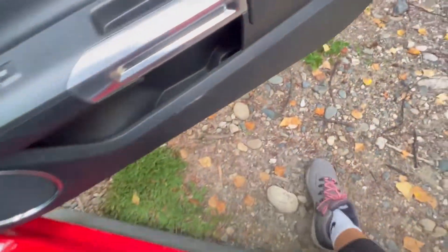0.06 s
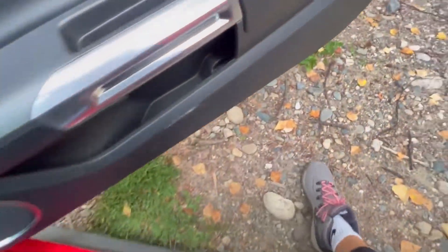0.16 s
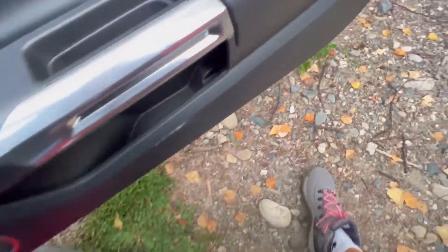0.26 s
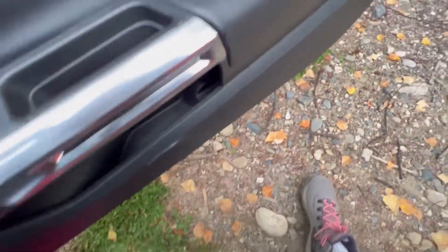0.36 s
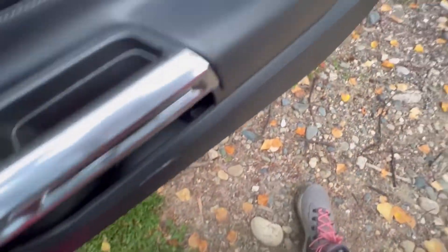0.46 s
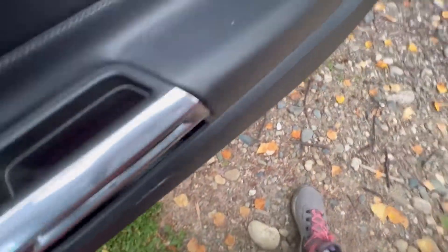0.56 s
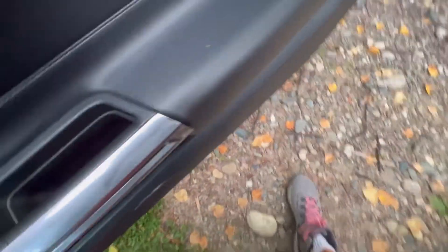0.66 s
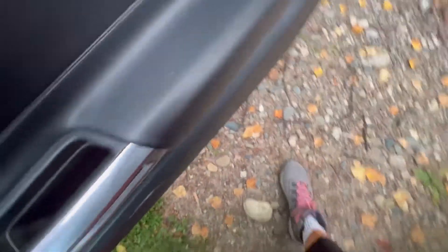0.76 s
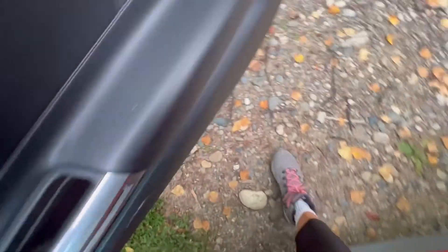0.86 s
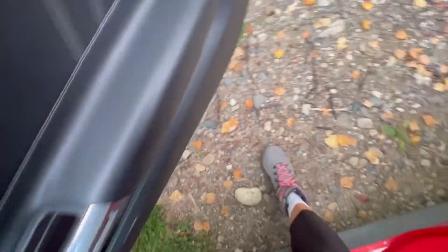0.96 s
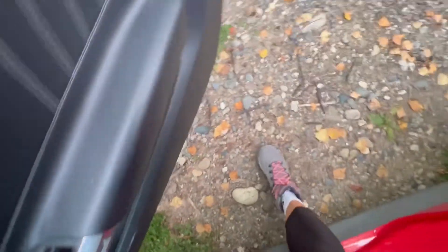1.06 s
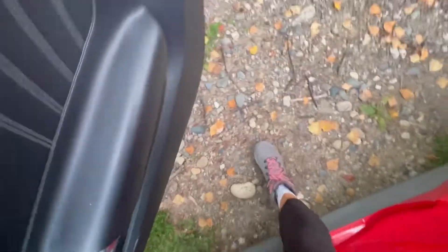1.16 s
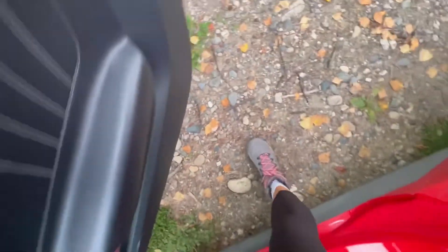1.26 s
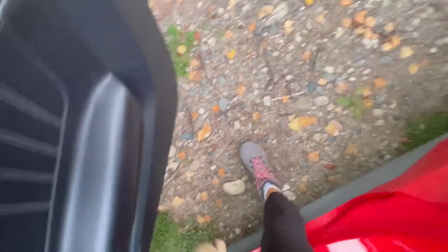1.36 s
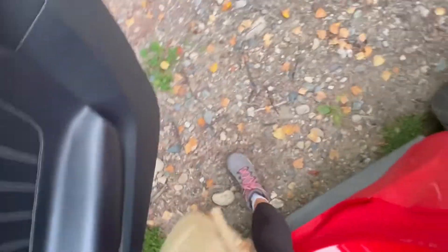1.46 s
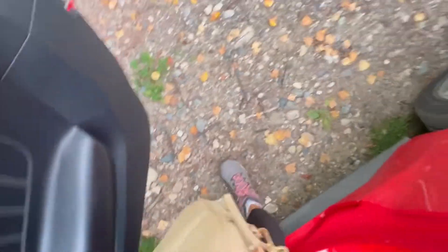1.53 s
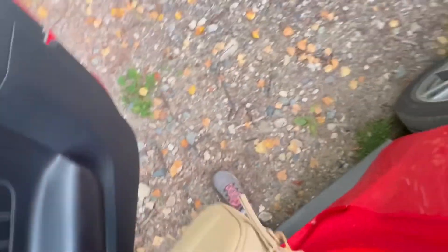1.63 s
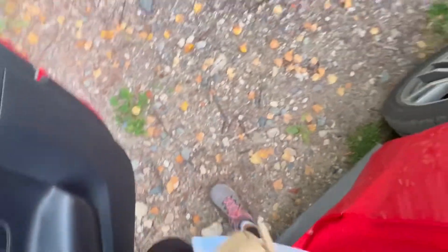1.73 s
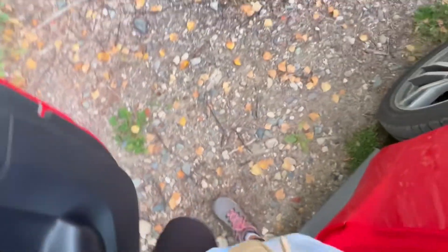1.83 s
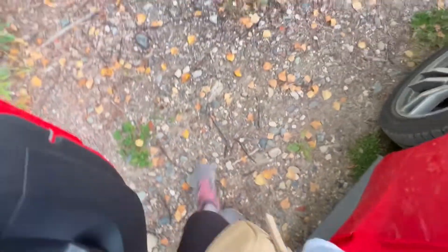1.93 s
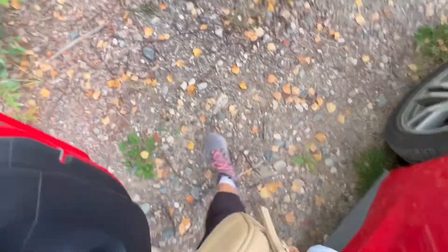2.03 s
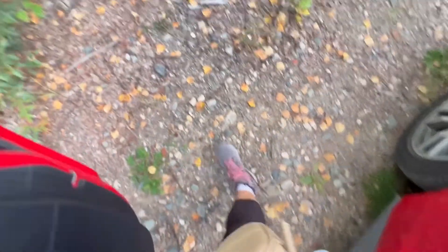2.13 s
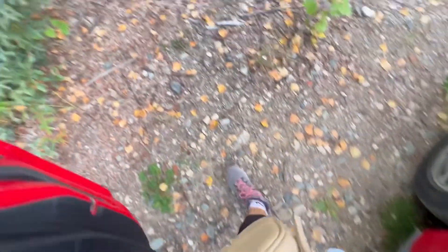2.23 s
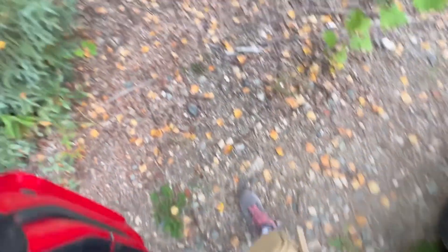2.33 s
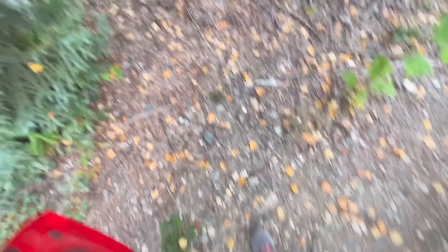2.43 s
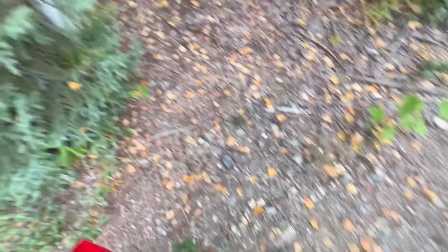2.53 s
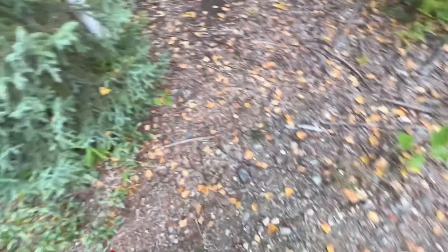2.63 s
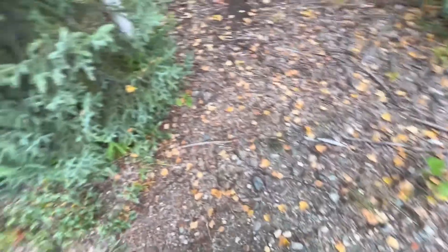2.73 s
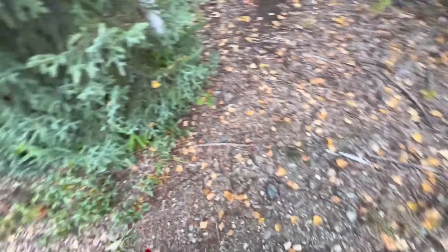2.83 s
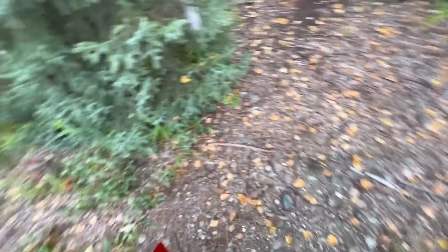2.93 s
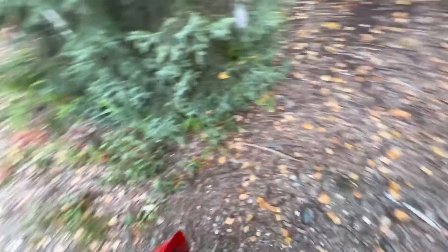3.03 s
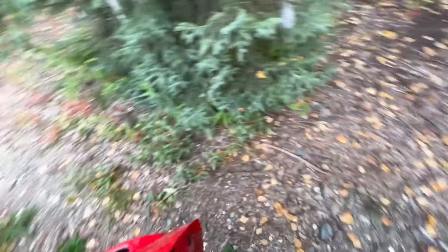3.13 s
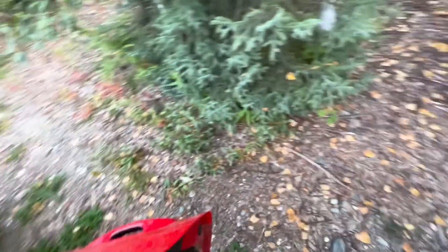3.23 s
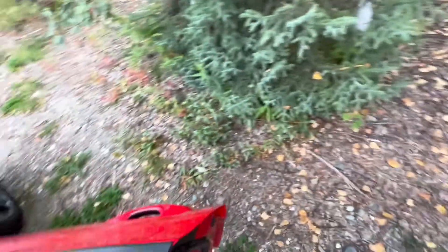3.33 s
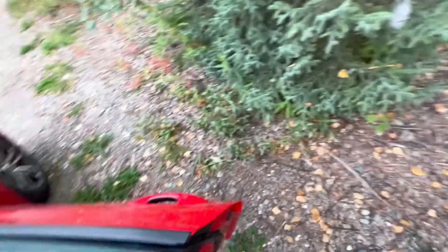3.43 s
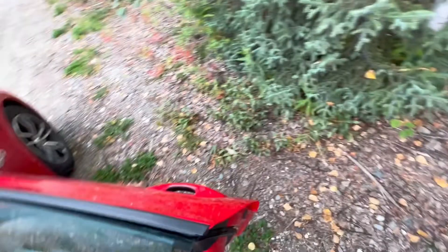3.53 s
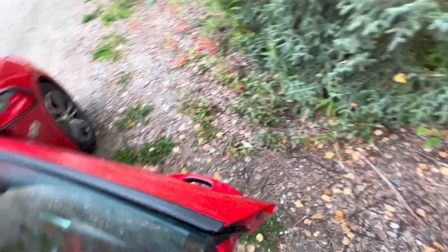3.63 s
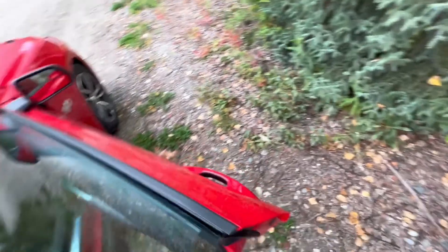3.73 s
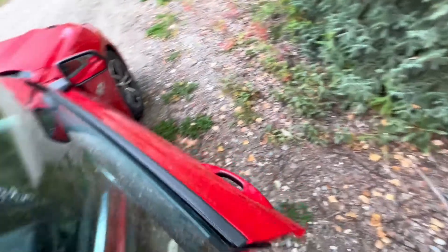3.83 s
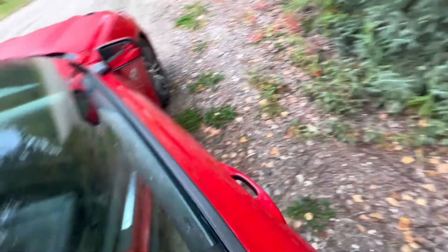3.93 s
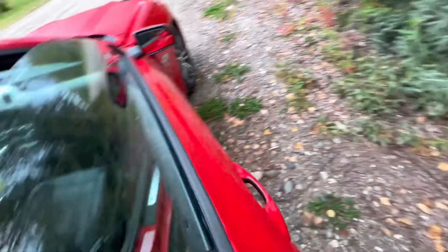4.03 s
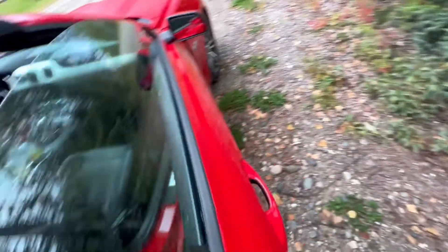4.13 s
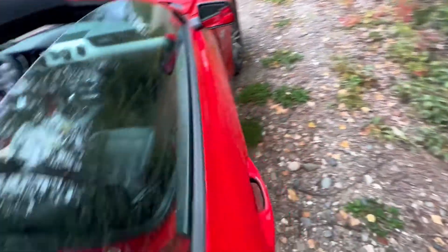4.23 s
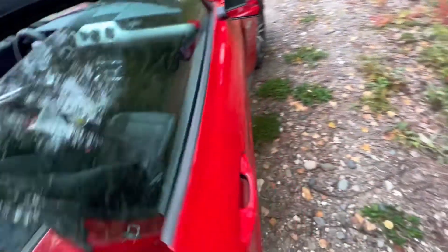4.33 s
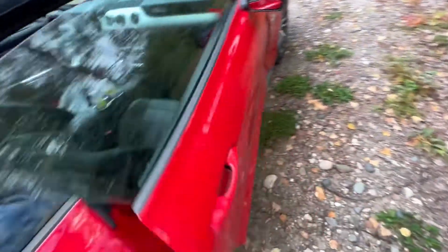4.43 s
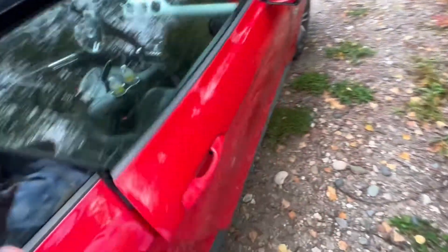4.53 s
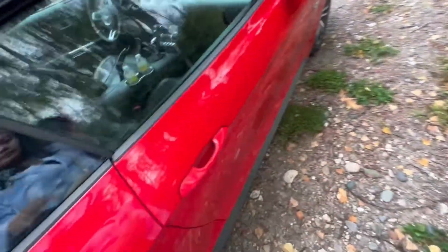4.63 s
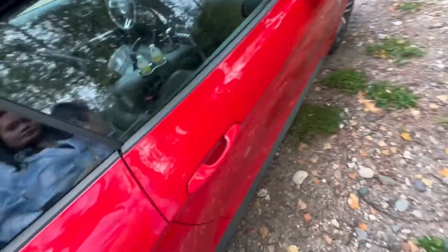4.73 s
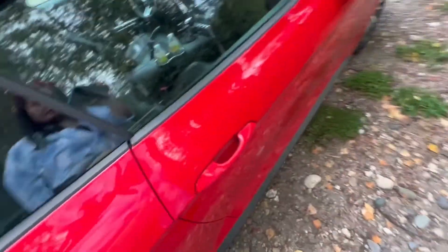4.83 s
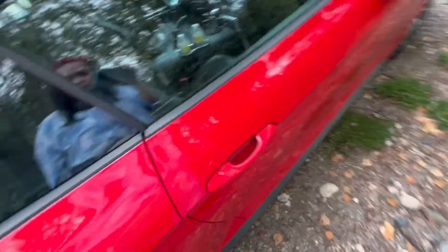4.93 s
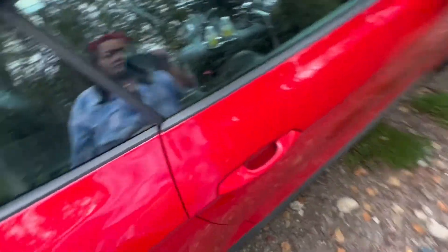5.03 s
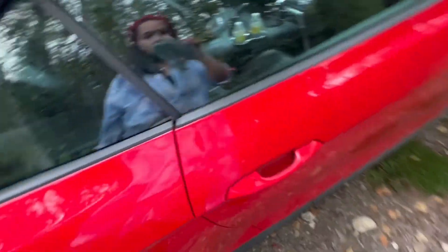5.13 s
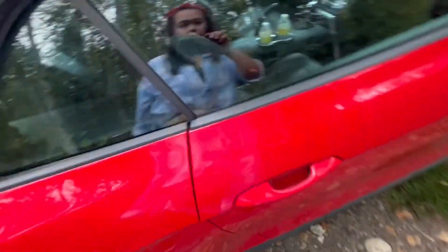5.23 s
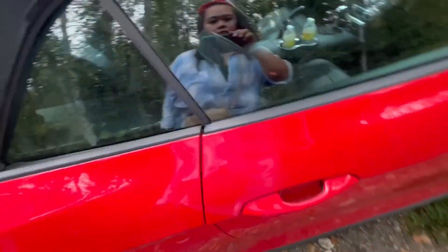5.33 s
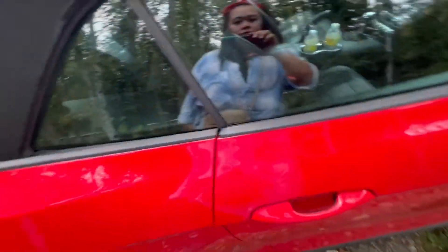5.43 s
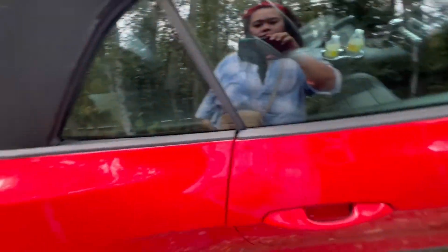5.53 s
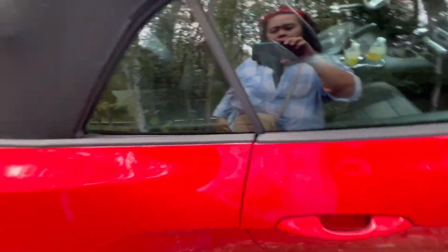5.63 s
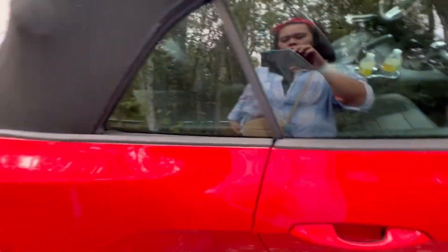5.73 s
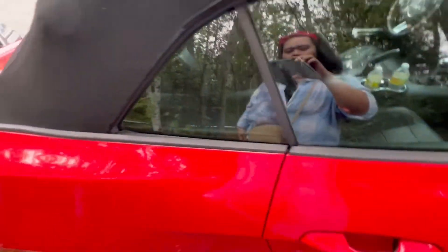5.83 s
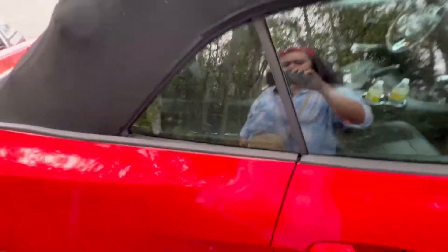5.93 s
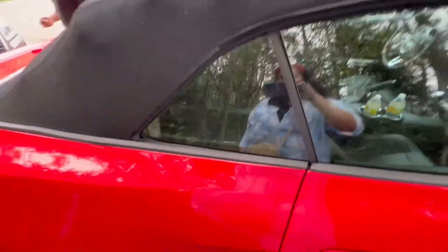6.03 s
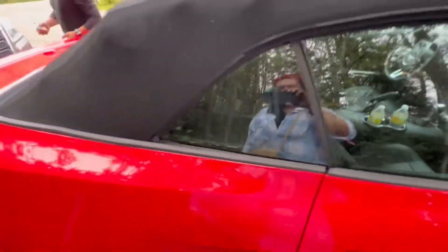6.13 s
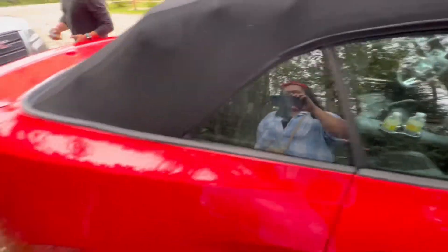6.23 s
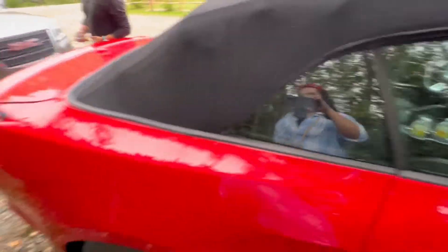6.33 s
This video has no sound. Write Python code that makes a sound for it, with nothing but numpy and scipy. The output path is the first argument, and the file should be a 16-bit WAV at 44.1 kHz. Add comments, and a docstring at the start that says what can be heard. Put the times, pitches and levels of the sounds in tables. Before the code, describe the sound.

A quiet outdoor gravel spot, heard close up on a handheld stereo microphone. From 0 to 0.6 s there are small knocks and clicks, gritty scuffs, hissing cloth and low handling rumble, with a soft low bump near 0.65 s. Faint steps and rustles continue around 1 and 1.7 s. Between 2.1 and 2.6 s, sharper dry knocks and a gravel crunch stand out. Around 2.9 to 3.3 s come gravel scuffs, fizzy fine rustling and a brief faint creak, then a near-quiet stretch. At 4.55 s a car door slams, by far the loudest event: a sharp metallic latch crack, rattling panels and a deep body boom. A duller, softer thud follows at 4.9 to 5.0 s. The resonance fades with faint echoes from ground and trees. Weak bumps come near 5.3 s, then light scuffs, rustles, clicks and handling rumble until about 6.4 s.

```python
"""Parking place on gravel, outdoors: a car door slams, with steps and rustling clothes around it.
Damped modes and soft pushes make the body boom; noise washes and modes the panels; short bursts the latch.
A second, duller door thud follows at once. Ground and trees return faint copies of the door sounds.
Clicks, knocks, scuffs and a creak are ringing ticks; grainy noise makes the gravel crunch and the cloth hiss.
A hand shifting on the camera rumbles over quiet outdoor air."""
import sys
import numpy as np
from scipy import signal
from scipy.fft import rfft, irfft, next_fast_len
from scipy.io import wavfile
from scipy.ndimage import uniform_filter1d, map_coordinates

SR = 44100
rng = np.random.default_rng(int(sys.argv[2]) if len(sys.argv) > 2 else 0)


def wav_record(signal):
    """Record a signal, one row per channel, as 16-bit PCM in the file named by sys.argv[1]."""
    frames = np.transpose(np.atleast_2d(signal))
    bounded = np.clip(frames, -1, 1)
    # unit amplitude maps onto the largest positive 16-bit level
    quanta = np.round(bounded * 32767).astype(np.int16)
    wavfile.write(sys.argv[1], SR, quanta)


N = 281799
TIME = np.arange(N) / SR  # s
FFT_SIZE = next_fast_len(N, True)
FREQ = np.fft.rfftfreq(FFT_SIZE, 1 / SR)  # Hz


def amp(db):
    """Decibels to gain."""
    return 10 ** (np.asarray(db) / 20)


def unit(x):
    """Scales to rms 1."""
    return x / np.sqrt(np.mean(x ** 2) + 1e-20)


def decay(t, t60_s):
    """Exponential decay, 60 dB down after t60_s."""
    return np.exp(-np.log(1000) * t / t60_s)


def read(points, hz):
    """Interpolates a spectrum table on a log-frequency axis."""
    f, value = np.transpose(points)
    return np.interp(np.log(hz + 1), np.log(f + 1), value)


def resonance(hz, centre_hz, sharpness):
    """Gain of a resonance, 1 at its centre."""
    return 1 / (1 + (sharpness * (hz / centre_hz - centre_hz / (hz + 1))) ** 2)


def panned(db):
    """Left and right gains of constant power for a left-right difference in dB."""
    half_db = np.atleast_1d(db) / 2
    gains = np.array([amp(half_db), amp(-half_db)])
    return gains / np.sqrt(np.mean(gains ** 2, 0))


def add(mix, s, sound):
    """Mixes a stereo sound in at time s."""
    part = mix[:, max(round(s * SR), 0):][:, :sound.shape[-1]]
    part += sound[..., :part.shape[1]]


def colour(x, gain):
    """Filters a whole track by a gain given on FREQ."""
    return irfft(rfft(x, FFT_SIZE) * gain, FFT_SIZE)[:, :N]


def paired(z, hz):
    """Two unrelated spectra become a microphone pair: alike in the bass, apart in the treble."""
    # left-right likeness: f/Hz, correlation
    likeness = [(60, 0.55), (150, 0.99), (300, 1), (600, 0.21), (1200, 0.084), (16000, 0.071)]
    same = np.clip(read(likeness, hz), -1, 1)
    return np.array([z[0], same * z[0] + np.sqrt(1 - same ** 2) * z[1]])


def random_phases(hz):
    """Two flat spectra of random phase."""
    return np.exp(2j * np.pi * rng.random((2, len(hz))))


def noise(spectrum, grain_db=0, grains_per_s=900, patch_db=0, patch_hz=260, patch_s=0.046):
    """Stereo noise of a given spectrum, in short grains of uneven size whose colour wanders in patches."""
    draws = np.minimum(rng.exponential(1, N), 4)
    sizes = amp(grain_db * draws[(TIME * grains_per_s).astype(int)])
    grains = rng.standard_normal((2, N)) * sizes / np.sqrt(uniform_filter1d(sizes ** 2, size=3000))
    hz, t, z = signal.stft(grains, SR, nperseg=512, noverlap=384)
    field = rng.standard_normal((512, 256))
    places = np.meshgrid(t / patch_s, hz / patch_hz, indexing="ij")
    patches = unit(map_coordinates(field, places, order=1, mode="wrap"))
    gain = amp(read(spectrum, hz) + patch_db * patches)
    gain /= np.linalg.norm(gain, axis=1, keepdims=True)  # patches move the colour and keep the power
    z = paired(z.transpose(0, 2, 1), hz) * gain
    return unit(signal.istft(z.transpose(0, 2, 1), SR, nperseg=512, noverlap=384)[1][:, :N])


def burst(gain_at, t60_s, size=8192):
    """A sharp dying burst with the spectrum gain_at(hz), scaled to the energy of its envelope."""
    hz, t = np.fft.rfftfreq(size, 1 / SR), np.arange(size) / SR
    z = paired(random_phases(hz), hz) * gain_at(hz)
    shape = amp(-60 * t / t60_s) * (1 - np.exp(-t * SR / 10))  # rises over 10 samples
    return unit(irfft(z) * shape) * np.sqrt(np.mean(shape ** 2))


def ring(modes, t, phases):
    """Sum of exponentially dying modes (f/Hz, level/dB, t60/s)."""
    return sum(amp(db) * decay(t, t60_s) * np.cos(2 * np.pi * hz * t + phase)
               for (hz, db, t60_s), phase in zip(modes, phases))


def strokes(rows, attack_s, release_s, dip_db=0, size=64):
    """Gain of rows (start/s, hold/s, level/dB): each swells, dips or peaks in mid hold, and dies away."""
    t = TIME[::size]
    start, hold, db = np.transpose(rows)[:, :, None]
    swell = .5 + .5 * np.tanh((t - start) / attack_s)
    progress = np.clip((t - start) / hold, 0, 1)
    held = amp(db + dip_db * (.5 - np.sin(np.pi * progress)))
    gain = swell * held * np.exp(-np.maximum(t - start - hold, 0) / release_s)
    return np.interp(TIME, t, np.linalg.norm(gain, axis=0))


def lurch(depth_db, per_s):
    """Random unevenness of a movement, as a gain of rms 1."""
    draws = np.clip(rng.standard_normal(2048), -1.7, 1.7)
    return unit(amp(depth_db * np.interp(TIME * per_s, np.arange(len(draws)), draws)))


def click(hz, t60_s, sharpness=2.0, ring_db=0, overtone=2.03, overtone_db=-14,
          soft_cycles=0.8, port_rad=0.31, size=4096):
    """A noise tick in a resonance and its overtone plus a ring at its pitch, with the energy of its decay."""
    t = np.arange(size) / SR

    def gain_at(f):
        return resonance(f, hz, sharpness) + amp(overtone_db) * resonance(f, overtone * hz, sharpness)

    tick = burst(gain_at, t60_s, size=size)
    phase = rng.uniform(0, 2 * np.pi) + port_rad * rng.uniform(-1, 1, (1, 2, 1))
    tone = ring([(hz, ring_db, t60_s)], t, phase)
    x = (tick + tone) * (1 - np.exp(-(hz * t / soft_cycles) ** 2))  # soft onset
    return x * np.linalg.norm(decay(t, t60_s)) / np.linalg.norm(x, axis=1, keepdims=True)


def slips(drive, spread_db, t60_s, centre_hz, pitch_range, tilt_db, count):
    """Tiny ticks at random moments and pitches, their level following the movement that drives them."""
    out = np.zeros((2, N))
    for when, pitch, size, side in rng.uniform(-1, 1, (count, 4)):
        at = int((when + 1) / 2 * (N - 1))
        gain = drive[..., at, None] * amp(spread_db * size + tilt_db * pitch)
        tick = click(centre_hz * pitch_range ** pitch, t60_s, size=2048)
        add(out, at / SR, gain * panned(4 * side) * tick)
    return out


def boom(ring_db=-1, push_cycles=0.53):
    """Each thump is a soft low push, and the car body rings on."""
    # low thumps and rocking swings of the car body: t/s, level/dB, push swing f/Hz, ring share (factor)
    thumps = [(0.646, -36, 108, 0.98), (0.713, -34, 55.6, 0.5), (0.746, -40, 70, 0.25),
              (1.406, -49, 86, 0.77), (4.564, -12, 153.7, 1.24), (4.581, -7, 60.6, 0.96),
              (4.604, -4.5, 86, 0.22), (4.677, -10.5, 56.6, 0.6), (4.802, -36, 75.6, 2.1),
              (4.925, -15.5, 87, 0.96), (4.943, -15, 63, 1.3), (4.999, -16, 51.3, 0.85),
              (5.015, -16, 56.3, 0.29), (5.066, -21, 85, 0.22), (5.111, -21.5, 49, 0.3),
              (5.277, -33, 93, 0.66), (5.356, -31.5, 115.6, 1.3), (5.396, -34, 80.2, 0.53),
              (6.298, -44, 65, 1.3)]
    # car body and cabin air modes: f/Hz, relative level/dB, t60/s
    body_modes = [(43.1, -19, .3), (56.3, -19.5, 0.84), (76.95, -9, 0.56), (92.3, -14, 0.26),
                  (110, -11, 0.34), (169.7, -11.5, 0.34), (183.7, -10.5, 0.39), (266, 1.5, 0.61),
                  (312, -10.5, .3)]
    out, t = np.zeros((2, N)), np.arange(SR) / SR
    body = ring(body_modes, t, np.zeros(len(body_modes)))
    u = t - .05  # push peaks at u = 0
    for s, db, hz, share in thumps:
        push = np.exp(-.5 * (u * hz / push_cycles) ** 2) * np.cos(2 * np.pi * hz * u)
        rung = signal.fftconvolve(push, body)[:SR] * 2 / abs(push).sum()
        add(out, s + u[0], amp(db) * (push + share * amp(ring_db) * rung))
    return out


def panels(skin_db=-11, rattle_db=1.5, count=7, size=24576):
    """Each shake excites skin and window modes and a rattling noise wash that decays band by band."""
    # door panel shakes: t/s, level/dB, dull above f/Hz, rise/s, decay length (factor), left-right/dB
    shakes = [(0.631, -28.5, 3000, 0.00051, 0.49, 4.5), (4.542, -16, 2630, 0.00047, 1.05, -4.5),
              (4.551, -21.5, 13960, 0.0067, 1.0, -3), (4.563, -17, 487, 0.015, 0.84, -2.5),
              (4.583, -15.5, 1940, 0.00068, 0.9, -1.5), (4.622, -32, 6960, 0.0012, 0.7, 2),
              (4.635, -21, 2440, 0.00061, 0.54, -3.5), (4.655, -22.5, 695, 0.0059, 0.58, -2.5),
              (4.677, -29, 2383, 0.0013, 0.34, -2.5), (4.874, -28.5, 398, 0.018, 1.0, -2),
              (4.901, -21, 421, 0.013, 1.0, -1.5), (4.940, -21, 830, 0.0063, .9, 0.5),
              (4.979, -39.5, 880, 0.0066, 1.4, -18), (5.327, -44, 338, 0.0033, .6, -2)]
    # panel wash spectrum: f/Hz, relative density/dB
    wash_spectrum = [(82, -36.5), (140, -7.5), (174, -10), (286, -13.5), (425, -15.5), (529, -14.5),
                     (851, -17.5), (921, -12), (1370, -12), (1700, -21), (2630, -22), (4590, -29),
                     (5940, -24.5), (16000, -61)]
    # panel wash decay before the length factor: f/Hz, t60/s
    wash_decay = [(150, 0.39), (500, 0.34), (1200, 0.078), (3000, 0.22), (8000, 0.3), (16000, 0.14)]
    # door skin and window modes: f/Hz, relative level/dB, t60/s before the length factor
    skin_modes = [(378.6, -11.5, 0.23), (435.4, -4, 0.25), (494, -15, .33), (677, -10, 0.15),
                  (770, -10.5, 0.17), (950, -3.5, 0.33), (1102, -5, 0.21), (1207, 0.5, 0.29),
                  (1190, 1, 0.2), (1450, -3.5, 0.19), (1418, -1.5, 0.37), (1630, -11.5, 0.44),
                  (1560, -2, .22), (1809, -8, 0.18), (2270, -10.5, 0.1), (2640, -13, .14),
                  (2995, -4.5, 0.12), (3330, -12, .13), (3176, -16.5, .17), (4100, -7, .15)]
    out, t, hz = np.zeros((2, N)), np.arange(size) / SR, np.fft.rfftfreq(size, 1 / SR)
    centres_hz = np.geomspace(125, 16000, count)
    bands = [read(list(zip(centres_hz, row)), hz) for row in np.eye(count)]
    ports = rng.uniform(0, 2 * np.pi, (len(skin_modes), 2, 1))  # each mode has its own phase at each port
    for s, db, dull_hz, rise_s, length, pan_db in shakes:
        def soft(f):
            return 1 / np.sqrt(1 + (f / dull_hz) ** 3)

        z = paired(random_phases(hz), hz) * amp(read(wash_spectrum, hz)) * soft(hz)
        z /= irfft(z).std()
        wash = sum(irfft(z * band) * decay(t, length * read(wash_decay, f))
                   for f, band in zip(centres_hz, bands))
        rattle = amp(rattle_db * unit(uniform_filter1d(rng.standard_normal(size), size=130)))
        modes = [(f, level + 20 * np.log10(soft(f)), t60_s * length) for f, level, t60_s in skin_modes]
        skin = ring(modes, t, ports + rng.uniform(0, 2 * np.pi, (len(skin_modes), 1, 1)))
        shake = (wash * rattle + amp(skin_db) * skin) * (1 - np.exp(-t / rise_s))
        add(out, s, amp(db) * panned(pan_db) * shake)
    return out


def latch(steel_db=-5, crack_db=1, steel_rise_s=.0003):
    """The latch snaps over the striker: hard cracks of a few milliseconds and the short ring of the steel."""
    # snaps: t/s, level/dB, crack t60/s, left-right/dB
    snaps = [(4.5426, -24.5, .014, 3), (4.5523, -8.5, 0.016, 1), (4.583, -19.5, 0.012, -1),
             (4.6225, -12, 0.016, 3), (4.9399, -29.5, 0.0084, -18), (4.9418, -21.5, 0.0088, 4)]
    # crack spectrum: f/Hz, relative density/dB
    crack_spectrum = [(400, -19), (1000, -16.5), (1600, -18.5), (2200, 9), (2550, -7.5), (3000, -5.5),
                      (3700, -8.5), (4500, -6), (5600, -10), (8000, -14.5), (11000, -28.5), (16000, -33)]
    # latch steel modes: f/Hz, relative level/dB, t60/s
    steel_modes = [(1130, -10, 0.031), (2450, -16.5, 0.02), (2530, 5.5, 0.011), (2904, -5, 0.035),
                   (2930, 0, 0.013), (3700, -14, 0.035), (5304, -11, .02)]
    out, t = np.zeros((2, N)), np.arange(8192) / SR
    for s, db, t60_s, pan_db in snaps:
        crack = amp(crack_db) * burst(lambda f: amp(read(crack_spectrum, f)), t60_s)
        steel = ring(steel_modes, t, rng.uniform(0, np.pi, (len(steel_modes), 2, 1)))
        steel *= 1 - np.exp(-t / steel_rise_s)
        add(out, s, amp(db) * panned(pan_db) * (crack + amp(steel_db) * steel))
    return out


def shudder(centre_hz=78, sharpness=2.2, attack_s=.012, release_s=0.08):
    """The whole car shudders as a door is swung or shut: lumpy low narrow-band noise."""
    # shudders: start t/s, hold/s, level/dB
    shudder_rows = [(0.65, .04, -44), (4.36, 0.22, -49.5), (4.57, 0.12, -24), (4.92, 0.088, -24),
                    (5.35, 0.045, -43)]
    rumble = unit(colour(rng.standard_normal((1, N)), resonance(FREQ, centre_hz, sharpness)))
    return strokes(shudder_rows, attack_s, release_s) * rumble


def ground(x, delay_s=0.0046, echo_db=-9, low_hz=600):
    """The gravel throws the sharp part of each sound back a moment later."""
    sharp = FREQ / np.hypot(FREQ, low_hz)
    return colour(x, 1 + amp(echo_db) * sharp * np.exp(-2j * np.pi * FREQ * delay_s))


def trees(x, t60_s=1.0, dull_hz=2200, build_up_s=0.019):
    """Dull scatter from the trees round the parking place: sparse random echoes, dying away."""
    t = np.arange(SR) / SR
    taps = rng.standard_normal((2, SR)) * (rng.random((2, SR)) < .05)
    taps = taps * decay(t, t60_s) * (1 - np.exp(-t / build_up_s))
    tail = signal.fftconvolve(x, unit(taps) / np.sqrt(SR), axes=1)[:, :N]
    return colour(tail, 1 / np.hypot(1, FREQ / dull_hz))


def clicks():
    """Clicks, knocks, short scuffs and a brief creak near 3.2 s: ringing ticks, some longer."""
    # ticks: t/s, level/dB, pitch f/Hz, t60/s, left-right/dB
    click_rows = [(0.013, -36.5, 1035, 0.044, 0), (0.056, -36.5, 1103, 0.068, -12),
                  (0.143, -37.5, 1480, 0.033, -1), (0.239, -27.5, 956, 0.045, 3),
                  (0.277, -23, 965, 0.019, 1.5), (0.307, -32, 960, 0.014, 10),
                  (0.353, -34.5, 880, 0.034, 0), (0.373, -36, 1140, 0.024, 2),
                  (0.442, -31.5, 1180, 0.025, -4), (0.444, -31, 2900, 0.021, -3),
                  (0.484, -33, 4100, 0.034, 9), (0.632, -32.5, 4350, 0.025, 7),
                  (0.728, -45.5, 2850, 0.025, 0), (1.048, -40.5, 3370, 0.014, 14),
                  (1.664, -43, 1010, .022, -2), (1.991, -38, 1240, 0.013, -11),
                  (2.1555, -20, 825, 0.018, -9.5), (2.235, -44, 9800, .012, 0),
                  (2.259, -38, 1500, 0.011, -13), (2.3477, -21.5, 1354, 0.024, -6),
                  (2.3731, -20.5, 3940, 0.003, 30), (2.374, -31, 2540, 0.021, -1),
                  (2.539, -34.5, 1570, 0.0057, -8), (2.565, -41, 8700, 0.013, -1),
                  (2.585, -34, 1300, 0.0069, -4.5), (3.182, -33, 1160, 0.03, -6),
                  (3.192, -37, 2460, 0.073, -3), (3.212, -34, 2460, 0.041, -2),
                  (3.225, -43, 2170, 0.013, 1), (3.273, -38, 9000, 0.023, -1), (3.357, -45, 11800, 0.07, 2),
                  (3.627, -49.5, 1725, 0.11, -3), (3.981, -45.5, 4760, 0.015, -1),
                  (4.012, -42, 503, 0.013, -6), (4.148, -50.5, 1500, 0.02, 3), (4.193, -47, 6900, .008, -4),
                  (4.402, -48, 1370, 0.03, 0), (4.44, -46.5, 7750, 0.0065, -2),
                  (4.866, -40, 8800, 0.012, 1), (4.903, -26, 460, 0.028, -3),
                  (4.912, -22.5, 263, 0.058, -2), (4.962, -28.5, 9300, 0.0081, -2),
                  (5.077, -44, 13800, 0.007, 0), (5.198, -40.5, 1105, 0.0071, -13),
                  (5.332, -46, 389, 0.041, 11), (5.375, -49, 1057, 0.087, -3), (5.989, -44, 6140, 0.074, 3),
                  (6.077, -41, 7260, 0.04, -4), (6.221, -35, 410, 0.042, 3), (6.222, -40, 1126, 0.018, 0),
                  (6.283, -43, 1400, 0.016, -6), (6.354, -39.5, 1270, 0.0081, 3)]
    out = np.zeros((2, N))
    for s, db, hz, t60_s, pan_db in click_rows:
        add(out, s, amp(db) * panned(pan_db) * click(hz, t60_s))
    return out


def pressure(attack_s=0.024, release_s=0.053, dip_db=1.5):
    """How hard the soles press and turn on gravel, left and right; it dips between heel and toe."""
    # steps: start t/s, hold/s, relative level/dB, left-right/dB
    steps = [(0.01, 0.11, -43, -3), (0.19, 0.13, -42, -2.5), (0.464, 0.17, -46.5, 3),
             (0.745, .02, -49.5, 2), (0.996, 0.057, -49.5, -1.5), (1.14, 0.23, -59, 3),
             (1.676, 0.084, -49, 3), (1.92, 0.16, -52.5, 4), (2.137, 0.25, -41.5, -3),
             (2.514, 0.029, -55.5, 0), (2.74, 0.078, -58.5, -1), (2.885, 0.41, -47, -7),
             (2.995, 0.011, -42.5, -3), (3.175, 0.058, -42, -1.5), (3.36, 0.042, -60, 15),
             (3.613, 0.079, -53.5, -0.5), (3.785, 0.39, -65, 1), (4.231, 0.14, -52, -3),
             (4.854, .36, -48, -2.5), (5.677, 0.06, -51.5, 2), (6.06, 0.21, -49, 0),
             (6.206, 0.011, -48.5, 4)]
    sides = [[(s, hold, db + 20 * np.log10(panned(pan_db)[side, 0])) for s, hold, db, pan_db in steps]
             for side in range(2)]
    return np.array([strokes(rows, attack_s, release_s, dip_db) for rows in sides])


def footsteps(scuff_db=-3):
    """Gravel crunches in coarse noise grains under the soles."""
    # crunch spectrum: f/Hz, relative density/dB
    gravel = [(100, -28.5), (250, -4), (420, 1.5), (620, -4.5), (850, 0.5), (1100, -2), (1350, -3),
              (1900, -9), (2600, -12), (3500, -23.5), (6000, -22), (9000, -49.5)]
    crunch = noise(gravel, grain_db=3.0, grains_per_s=400, patch_db=4.5, patch_hz=133.5, patch_s=.03)
    return amp(scuff_db) * pressure() * lurch(depth_db=3.0, per_s=51) * crunch


def grit(grit_db=0):
    """Small stones slip under the sole, as loud as the step is heavy; the small high ones are weaker."""
    return amp(grit_db) * slips(pressure(), spread_db=3.5, t60_s=0.0099, centre_hz=1780,
                                pitch_range=2.8, tilt_db=-1, count=170)


def clothes(cloth_db=-0.5, fizz_db=-.5, tick_db=6, walk_db=-71, walk_until_s=5.3, walk_fade_s=.1):
    """Cloth hisses and ticks in fine grains: a faint rustle through the walk, a swish at each limb swing."""
    # swishes: start t/s, hold/s, relative level/dB, top octave against the rest/dB
    swishes = [(0.01, 0.39, -51, -5), (0.424, 0.19, -50, -8.5), (0.655, 0.22, -60.5, -10),
               (0.951, 0.12, -52.5, -11), (1.116, .29, -62, -10), (1.63, .27, -60, -8.5),
               (1.922, 0.17, -55.5, -10), (2.117, 0.28, -54, -3), (2.8, .015, -67.5, 1.5),
               (2.89, .26, -68, 12.5), (3.172, 0.12, -62, 11), (3.334, 0.042, -54, 5),
               (3.44, .58, -65.5, -5.5), (4.228, 0.14, -63, -2), (4.855, .13, -51.5, 1),
               (5.101, .07, -58, 0), (5.196, 0.16, -69, -2), (5.681, 0.094, -56.5, -22),
               (5.98, 0.032, -55.5, 3.5), (6.075, 0.017, -57, 4.5), (6.15, .17, -56, -7)]
    # cloth hiss spectrum: f/Hz, relative density/dB
    cloth_spectrum = [(1200, -3.5), (2500, -3.5), (4500, -5.5), (7000, -7), (9000, -15), (11000, -30.5)]
    # top-octave fizz spectrum: f/Hz, relative density/dB
    fizz_spectrum = [(6500, -13.5), (8800, -4), (10500, -16.5), (12200, -14), (14000, -29.5), (16000, -18)]
    swing = dict(attack_s=0.0096, release_s=0.054, dip_db=-1.5)  # loudest in mid swing
    walk = amp(walk_db) * np.exp(-np.maximum(TIME - walk_until_s, 0) / walk_fade_s)
    rub = strokes([(s, hold, db) for s, hold, db, top_db in swishes], **swing)
    rub_top = strokes([(s, hold, db + top_db) for s, hold, db, top_db in swishes], **swing)
    hiss = noise(cloth_spectrum, grain_db=2.5, grains_per_s=1100, patch_db=4.0, patch_hz=219.5, patch_s=.035)
    cloth = amp(cloth_db) * np.hypot(rub, walk) * hiss
    fizz = amp(fizz_db) * rub_top * noise(fizz_spectrum, grain_db=3.5, grains_per_s=570,
                                          patch_db=3.5, patch_hz=302.4)
    ticks = slips(rub_top, spread_db=5, t60_s=.007, centre_hz=9220, pitch_range=1.1, tilt_db=-2.5, count=110)
    return cloth + fizz + amp(tick_db) * ticks


def handling(rumble_db=-2, footfall_db=-16):
    """The hand shifting its grip and each footfall rumble in the camera body."""
    # grip shifts: start t/s, hold/s, relative level/dB
    grips = [(0.01, 0.47, -47), (0.57, 0.1, -39.5), (0.85, 0.62, -61.5), (1.39, 0.013, -45),
             (1.7, .08, -56), (2.15, 0.27, -58), (2.92, 0.059, -60), (3.5, 0.43, -64.5),
             (3.95, 0.17, -57.5), (4.34, 0.073, -47), (5.2, 0.17, -46.5), (5.66, 0.023, -49),
             (6.0, 0.018, -52), (6.155, 0.16, -44.5)]
    # rumble spectrum: f/Hz, relative density/dB
    rumble_spectrum = [(20, -11.5), (45, 1), (80, 10), (125, 3.5), (200, 2.5), (310, 1.5), (430, -7),
                       (550, -10.5), (700, -41), (1100, -73.5)]
    grip = strokes(grips, attack_s=0.013, release_s=0.026, dip_db=2.5)
    hand = np.hypot(grip, amp(footfall_db) * pressure())
    return amp(rumble_db) * hand * lurch(depth_db=2.0, per_s=38) * noise(rumble_spectrum)


def outdoor_air(air_db=-67):
    """Quiet outdoor air: steady coloured noise."""
    # air spectrum: f/Hz, relative density/dB
    air_spectrum = [(18, -36.5), (30, -4), (64, 1.5), (295, -16.5), (1720, -16.5), (4080, -33), (8080, -24),
                    (12300, -43.5), (13700, -40.5), (16000, -45)]
    return amp(air_db) * noise(air_spectrum)


def scene(scatter_db=-27):
    """Doors with their echoes, clicks, steps, clothes, handling and air."""
    doors = ground(boom() + shudder() + panels() + latch())
    person = clicks() + grit() + footsteps() + clothes() + handling()
    return doors + amp(scatter_db) * trees(doors) + person + outdoor_air()


def record(dry, low_hz=26, lag_s=0.00043, lag_below_hz=350, edge_hz=16100):
    """Ports colour the sound and cut deep bass; bass lags at right; peaks are rounded, then band-limited."""
    # port colour: f/Hz, left-right/dB
    mic_side = [(90, 1), (180, 5), (500, 2.5), (950, 1), (1500, 1.5), (2600, -0.5), (3800, 1.5),
                (5800, 5.5), (7200, 4), (8500, -4), (10000, -7), (12000, 0)]
    lead_rad = np.pi * FREQ * lag_s / np.hypot(1, FREQ / lag_below_hz)  # half the lag for each port
    x = colour(dry, panned(read(mic_side, FREQ)) * np.exp(1j * np.array([lead_rad, -lead_rad])))
    x = signal.sosfilt(signal.butter(1, low_hz, "high", fs=SR, output="sos"), x)
    x = x / (1 + (x / .95) ** 8) ** (1 / 8)
    band_limit = signal.firwin(511, edge_hz, window=("kaiser", 9), fs=SR)
    return signal.oaconvolve(x, band_limit[None], "same")


dry = scene()
out = record(dry)
wav_record(out)
```